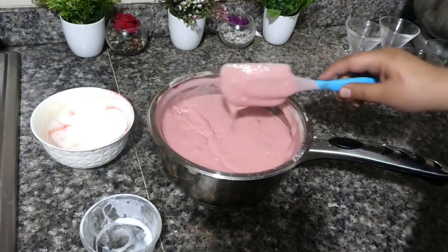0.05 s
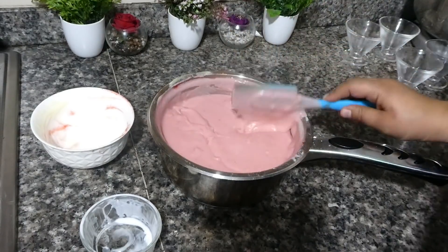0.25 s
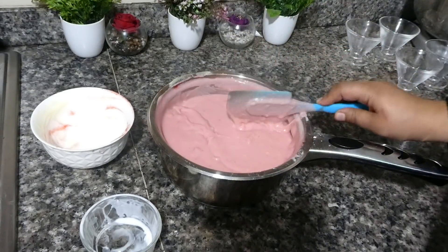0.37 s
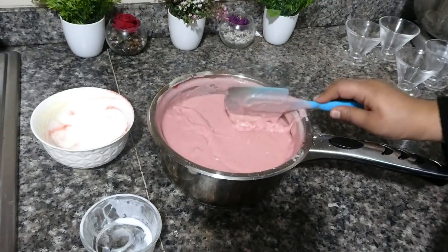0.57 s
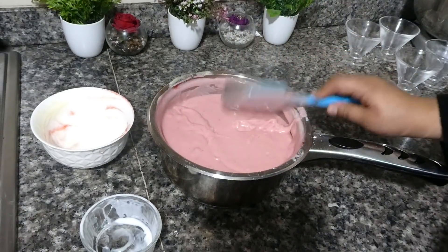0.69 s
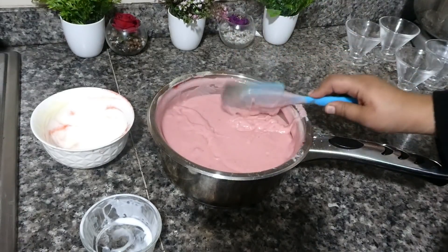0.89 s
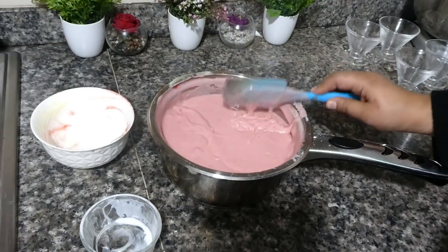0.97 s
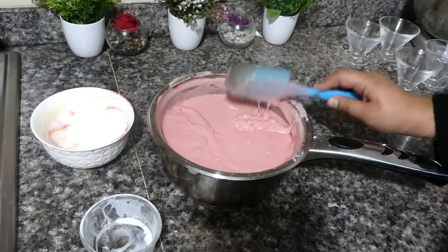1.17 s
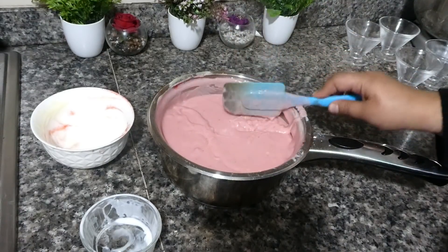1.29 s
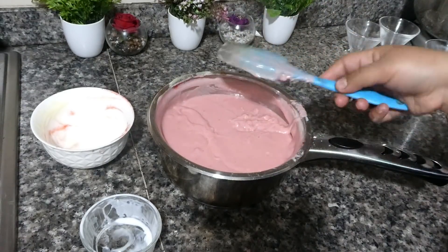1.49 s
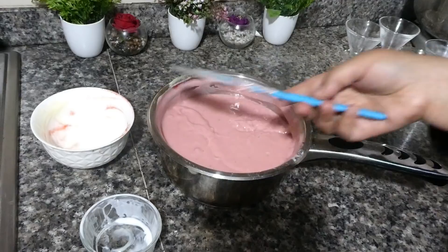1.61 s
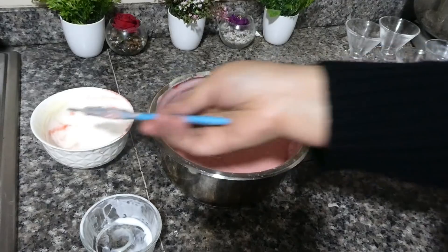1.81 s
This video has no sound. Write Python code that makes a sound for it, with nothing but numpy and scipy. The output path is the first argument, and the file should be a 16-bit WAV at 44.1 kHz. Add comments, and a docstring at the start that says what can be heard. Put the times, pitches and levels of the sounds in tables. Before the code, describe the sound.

Seven sharp spatula taps land in a steady run on a nearby batter-filled steel pan, each clanking briefly and ringing faintly. The kitchen adds a short echo, with a low appliance hum and soft arm rustle underneath.

```python
"""Tiled kitchen: a spatula knocks seven times on the rim of a steel saucepan of thick batter. Each knock: a
hard crack, a short clank of the batter-damped wall, a faint ring of the bare rim. Counter and tiles return
early reflections and a reverberant tail. Underneath: room noise, a low appliance hum and the soft slop of
batter stirred by the spatula."""
import sys
import numpy as np
from scipy import signal
from scipy.fft import rfft, irfft
from scipy.io import wavfile

SR = 44100
rng = np.random.default_rng(int(sys.argv[2]) if len(sys.argv) > 2 else 0)


def waveform_to_disk(signal):
    """Save audio, clipped to [-1, 1], as 16-bit WAV at the path in sys.argv[1]."""
    frames = np.transpose(np.atleast_2d(signal))
    scaled = np.clip(frames, -1, 1) * 32767
    samples = np.round(scaled).astype(np.int16)
    wavfile.write(sys.argv[1], SR, samples)


N = 81585

# room noise spectrum: f/Hz, relative density/dB
AIR_SPECTRUM = [(25, -45), (60, -32), (100, -13.5), (160, -15.5), (250, -12.5), (330, -10.5), (400, -15.5),
                (650, -14), (1100, -24), (1500, -24), (4600, -35.5), (9800, -41), (14500, -54),
                (16500, -67)]
# appliance hum partials: f/Hz, level/dB
HUM_PARTIALS = [(100.5, -69.5), (300.3, -48)]
# gain on the hum: t/s, gain/dB
HUM_ENVELOPE = [(0, 2.5), (.16, 4), (.45, -1), (1.5, -2), (1.85, -1)]
# batter stir spectrum: f/Hz, relative density/dB
STIR_SPECTRUM = [(25, -57), (100, -29.5), (150, -8.5), (330, 0), (420, -7), (620, -6), (1100, -19.5),
                 (3000, -29.5), (5000, -26.5), (8000, -35), (16000, -45)]
# batter stir envelope: t/s, level/dB
STIR_ENVELOPE = [(0, -46), (.14, -47.5), (.3, -43.5), (.6, -49.5), (1.6, -57), (1.85, -47.5)]
# reverberation spectrum: f/Hz, gain/dB
REVERB_SPECTRUM = [(80, -7), (170, 2.5), (220, 6.5), (320, 8.5), (450, 4), (600, 3), (900, -4), (1200, 7),
                   (1900, -5.5), (2700, -3.5), (4200, -9.5), (5300, -6.5), (6300, -8.5), (8000, -5.5),
                   (11000, -8), (15000, -13)]
# reverberation decay: f/Hz, T60/s
REVERB_DECAY = [(150, 1), (400, 0.3), (1000, 0.44), (2800, 0.49), (6000, 0.45), (9000, 0.39), (15000, 0.14)]
# contact tick spectrum: f/Hz, gain/dB
TICK_SPECTRUM = [(50, -20), (170, 6.5), (500, 5.5), (1150, 17.5), (1900, 5), (3600, 15), (4450, 10.5),
                 (5100, 14), (7800, 5.5), (8800, 5.5), (10500, -2.5), (12800, -10), (14200, -10.5),
                 (16000, -33.5), (18000, -36.5)]
# pan modes, batter-damped but for two of the bare rim: f/Hz, level/dB, T60/s
PAN_MODES = [(240.6, -35, 0.026), (342.6, -30.5, 0.023), (767, -22, 0.044), (960.6, -13, 0.017),
             (1057, -29.5, .04), (1455, -27, 0.018), (1641, -32, .03), (1797, -42, .03), (2405, -55.5, .45),
             (2352, -16.5, 0.022), (2527, -21.5, 0.024), (2804, -24.5, 0.054), (3060, -53, .5),
             (2960, -36, 0.032), (3198, -21, 0.029), (5300, -51.5, .013), (5400, -24.5, .015),
             (6345, -19, 0.018), (7450, -37, .018)]
# knocks: t/s, strength/dB, crack f/Hz, then trims: crack/dB, body/dB, rim/dB, tick/dB, clack/dB
KNOCKS = [(0.2366, -1, 5400, 3, 5.5, 7, 0.5, -1), (0.4137, 3, 5500, -2.5, 2.5, 4.5, -4.5, -3),
          (0.5904, 2, 6230, -6, 0.5, 4, -2.5, -2), (.7668, -1.5, 6220, -1.5, 2, 7, -0.5, 1),
          (0.9513, 0.5, 6190, -4, 0.5, 4.5, -2.5, 1.5), (1.134, -2.5, 6200, -3, 6.5, 8, 0, 5.5),
          (1.3183, 3.5, 6200, -7, -1, 0.5, -5, -1.5)]

ROOM_SIDE_DB = -10


def amp(db):
    """dB to gain."""
    return 10 ** (np.asarray(db) / 20)


def unit_rms(x):
    """Scale to rms 1."""
    return x / np.sqrt(np.mean(x ** 2) + 1e-20)


def log_interp(table, hz):
    """Table value on a log-frequency axis."""
    f, value = np.transpose(table)
    return np.interp(np.log(hz + 1), np.log(f), value)


def add(mix, start_s, sound):
    """Mix in at start_s."""
    part = mix[..., max(round(start_s * SR), 0):][..., :sound.shape[-1]]
    part += sound[..., :part.shape[-1]]


def stereo(mid_side, side_db):
    """Mid/side to left/right."""
    return mid_side[0] + np.array([[1], [-1]]) * amp(side_db) * mid_side[1]


def pulse(t, rise_s):
    """Envelope: peak of 1 at rise_s, then a fast decay."""
    u = np.maximum(t, 0) / rise_s
    return u * np.exp(1 - u)


def waver():
    """Slow random motion, 0.5-10 Hz, rms 1."""
    t = np.arange(N) / SR
    rates_hz = np.geomspace(.5, 10, 20)
    return unit_rms(sum(np.sin(2 * np.pi * (hz * t + rng.random())) / np.sqrt(hz) for hz in rates_hz))


def noise(spectrum):
    """Stereo noise of the given spectral shape."""
    white = rfft(rng.standard_normal((2, N)))
    gain = amp(log_interp(spectrum, np.fft.rfftfreq(N, 1 / SR)))
    return stereo(unit_rms(irfft(white * gain, N)), side_db=-4)


def appliance_hum(t, waver_db=.5, waver_rad=.15):
    """Two low partials, wavering in level and phase."""
    hum = np.zeros(N)
    for hz, db in HUM_PARTIALS:
        peak = np.sqrt(2) * amp(db + waver_db * waver())
        hum += peak * np.sin(2 * np.pi * hz * t + waver_rad * waver())
    return hum * amp(np.interp(t, *np.transpose(HUM_ENVELOPE)))


def room_noise(level_db=-53.5):
    """Soft, steady noise floor."""
    return amp(level_db) * noise(AIR_SPECTRUM)


def batter_stir(t):
    """Low slop of wet batter as the spatula stirs and leaves it."""
    return amp(np.interp(t, *np.transpose(STIR_ENVELOPE))) * noise(STIR_SPECTRUM)


def reverb_tail(delay_s=0.0025, rise_s=0.0034):
    """Diffuse kitchen impulse response; each band decays at its own rate."""
    hz, t, bands = signal.stft(rng.standard_normal((2, SR)), SR, nperseg=256)
    t60_s = log_interp(REVERB_DECAY, hz)[:, None]
    bands *= amp(log_interp(REVERB_SPECTRUM, hz)[:, None] - 60 * t / t60_s)
    bands *= np.sqrt(2 * np.log(1000) / (t60_s * SR))  # band energy independent of T60
    tail = signal.istft(bands, SR, nperseg=256)[1][:, :SR]
    age_s = np.maximum(np.arange(SR) / SR - delay_s, 0)
    return stereo(tail * (1 - np.exp(-age_s / rise_s)), ROOM_SIDE_DB)


def early_reflections(gain_db=-9, decay_s=0.004):
    """Impulse response of the short scatter off counter and tiles."""
    t = np.arange(SR // 20) / SR
    spray = rng.standard_normal((2, len(t))) * np.exp(-t / decay_s)
    return amp(gain_db) * stereo(spray / np.linalg.norm(spray[0]), ROOM_SIDE_DB)


def steel_click(travel_1khz_s=0.001346, size=2048):
    """Click dispersed by its run through the steel: treble arrives first."""
    hz = abs(np.fft.fftfreq(size, 1 / SR))
    log_gain = np.log(amp(log_interp(TICK_SPECTRUM, hz)))
    minimum_phase = np.exp(np.conj(signal.hilbert(log_gain)))
    dispersion = np.exp(-4j * np.pi * travel_1khz_s * np.sqrt(1000 * hz))
    return irfft((minimum_phase * dispersion)[:size // 2 + 1])


def contact_tick(t, scuff_db=-22.5, highpass_hz=5300):
    """Blade contact: an impulse and a brief bright scuff, both through the steel."""
    skid = pulse(t, rise_s=0.00074) * stereo(rng.standard_normal((2, len(t))), side_db=-9)
    scuff = signal.sosfilt(signal.butter(2, highpass_hz, "high", fs=SR, output="sos"), skid)
    force = (t == 0) + amp(scuff_db) * scuff
    return signal.fftconvolve(force, steel_click()[None], axes=1)[:, :len(t)]


def rim_clack(t, trim_db, base_db=-12, hz=2730, lag_s=0.00024):
    """The rim flexing under the blade."""
    return amp(base_db + trim_db) * pulse(t - lag_s, rise_s=0.00049) * np.sin(2 * np.pi * hz * t)


def pan_ring(t, body_db, rim_db, rim_above_hz=1300, lag_s=0.000616, rise_s=0.0014):
    """Decaying pan modes; they build as the bending wave spreads round the wall."""
    age_s = np.maximum(t - lag_s, 0)
    onset = 1 - np.exp(-age_s / rise_s)
    ring = np.zeros(len(t))
    for hz, db, t60_s in PAN_MODES:
        level_db = db + (rim_db if hz > rim_above_hz else body_db) - 60 * age_s / t60_s
        ring += amp(level_db) * onset * np.sin(2 * np.pi * hz * age_s)
    return ring


def steel_crack(t, hz, trim_db, base_db=-3.5, rise_s=.0005, pitch_sag=0.013):
    """Hard, bright crack of the steel right under the blade."""
    cycles = np.cumsum(hz * (1 + pitch_sag * np.exp(-t / rise_s))) / SR
    return amp(base_db + trim_db) * pulse(t, rise_s) * np.sin(2 * np.pi * cycles)


def saucepan_knocks(crack_send_db=-6, early_delay_s=0.0028, tail_drift=0.74):
    """Knocks and their echoes; the moving arm alters the tail each time."""
    t = np.arange(SR // 2) / SR
    mix = np.zeros((2, N))
    common_tail = np.sqrt(1 - tail_drift ** 2) * reverb_tail()
    for start_s, strength_db, crack_hz, crack_db, body_db, rim_db, tick_db, clack_db in KNOCKS:
        pan = rim_clack(t, clack_db) + pan_ring(t, body_db, rim_db) + amp(tick_db) * contact_tick(t)
        pan *= amp(strength_db)
        crack = steel_crack(t, crack_hz, strength_db + crack_db)
        add(mix, start_s, pan + crack)
        send = pan + amp(crack_send_db) * crack  # crack beams at the listener, less into the room
        add(mix, start_s + early_delay_s, signal.fftconvolve(send, early_reflections(), axes=1))
        tail = common_tail + tail_drift * reverb_tail()
        add(mix, start_s, signal.fftconvolve(send, tail, axes=1))
    return mix


def scene():
    """Knocks over the kitchen background."""
    t = np.arange(N) / SR
    return saucepan_knocks() + appliance_hum(t) + room_noise() + batter_stir(t)


def record(dry):
    """Soft clip of the hardest peaks, then low-pass."""
    ceiling, cutoff_hz = 1.4, 16500
    rounded = ceiling * np.tanh(dry / ceiling)
    lowpass = signal.firwin(401, cutoff_hz, window=("kaiser", 9), fs=SR)
    return signal.oaconvolve(rounded, lowpass[None], "same")


dry = scene()
out = record(dry)
waveform_to_disk(out)
```